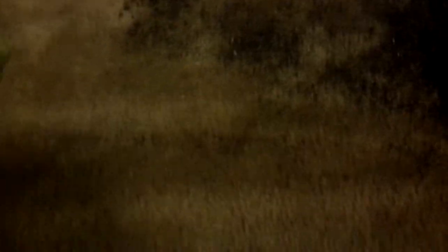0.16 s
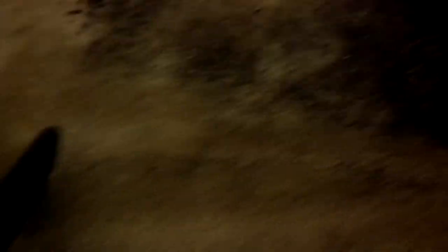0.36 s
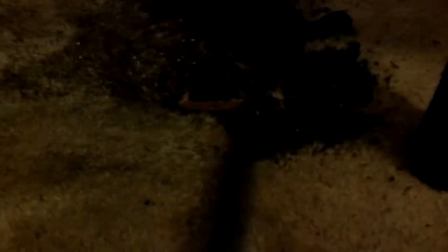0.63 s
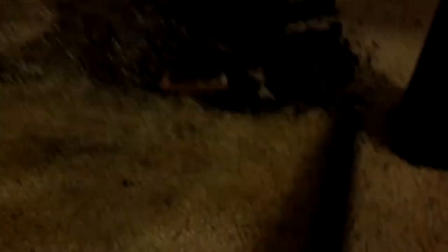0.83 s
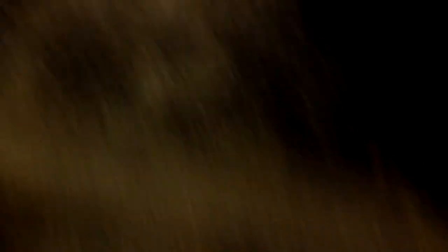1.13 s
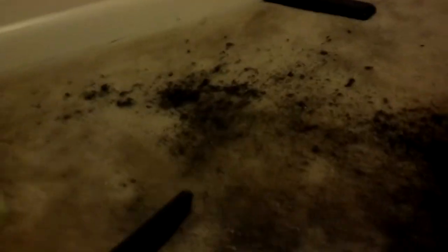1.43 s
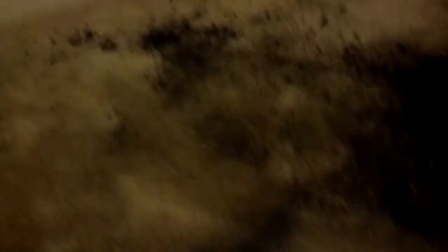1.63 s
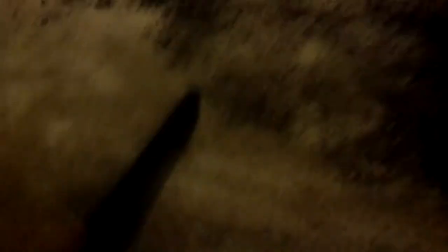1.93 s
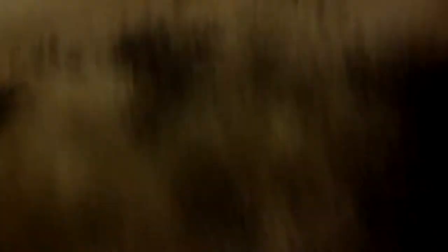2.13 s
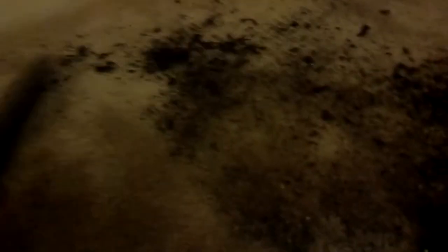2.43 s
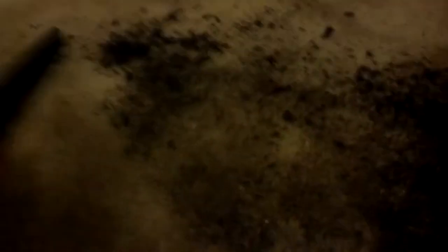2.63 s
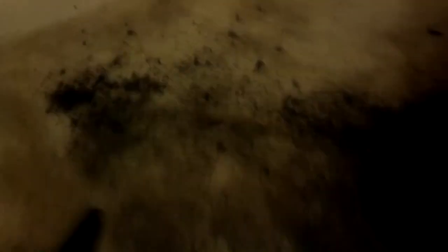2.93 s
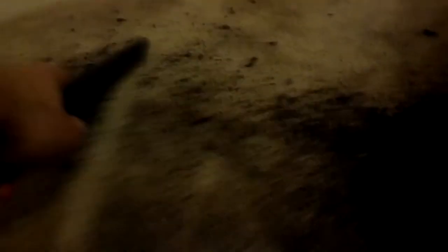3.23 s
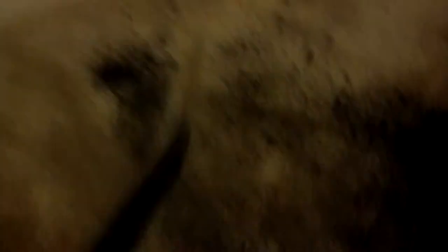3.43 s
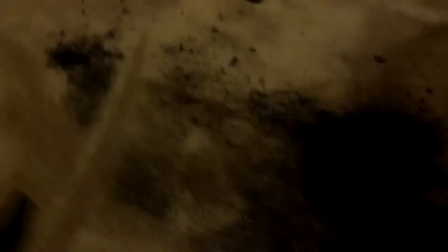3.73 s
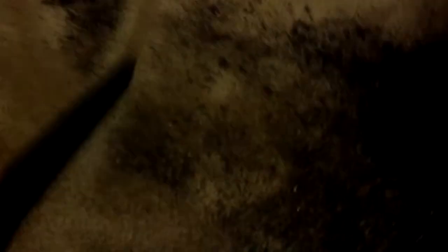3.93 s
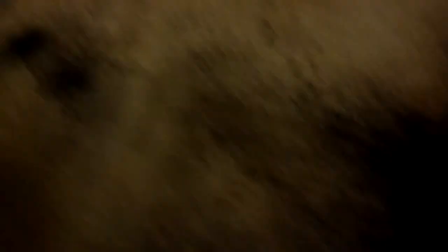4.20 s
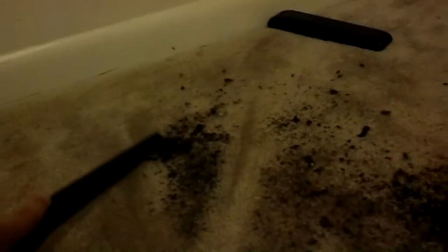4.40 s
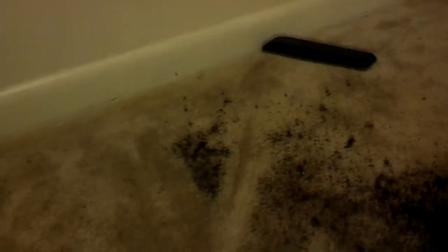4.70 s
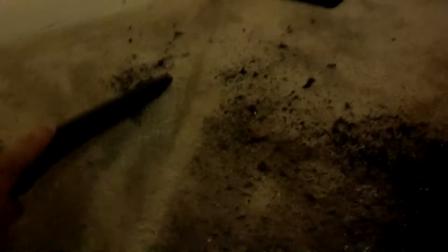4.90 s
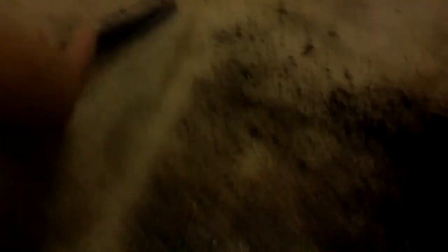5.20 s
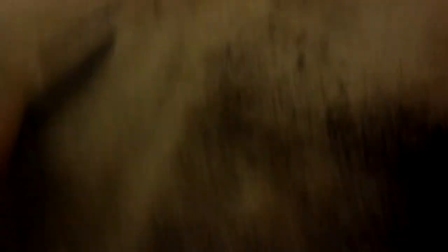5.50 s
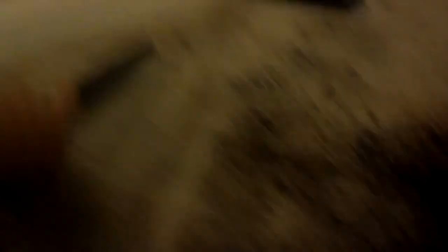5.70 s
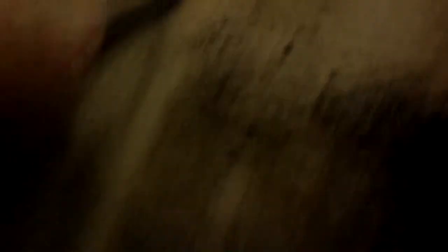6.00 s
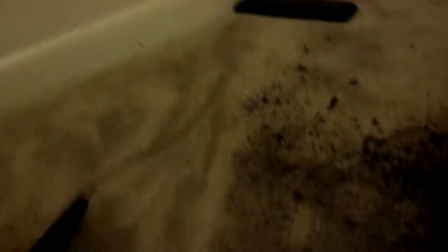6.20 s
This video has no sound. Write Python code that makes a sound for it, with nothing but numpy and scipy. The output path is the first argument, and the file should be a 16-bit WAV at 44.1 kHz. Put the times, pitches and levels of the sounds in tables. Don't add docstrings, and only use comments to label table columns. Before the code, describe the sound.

Steady vacuum roar and thin singing whine, pumping in loudness as the hose nozzle sweeps dirty carpet, bumping dully now and then.

```python
import sys
import numpy as np
from scipy import signal
from scipy.fft import rfft, irfft, next_fast_len
from scipy.io import wavfile

SR = 44100
rng = np.random.default_rng(int(sys.argv[2]) if len(sys.argv) > 2 else 0)


def volts_from_db(level):
    exponent = np.asarray(level, float) / 20
    return 10 ** exponent


def transcribe(signal):
    frames = np.atleast_2d(signal).T
    limited = np.clip(frames, -1, 1)
    pcm = np.round(limited * 32767).astype(np.int16)
    wavfile.write(sys.argv[1], SR, pcm)


N = 280035
COARSE = 40
BEAM_LAG = 16

# (time [s], level [dB])
NEARNESS = [(0, 1), (1.5, -0.5), (2.2, 0.5), (3.4, -0.5), (3.85, 3), (4.4, 1.5), (5, -0.5), (6.35, 5)]
# (time [s], length [s], change [dB])
HUM_SWELLS = [
    (.1, 0.85, -3.5),
    (.64, 0.33, -14),
    (1.0, .7, -3),
    (1.55, 0.52, -3),
    (3.1, 0.15, -3),
    (3.5, 0.52, -3),
    (3.85, 0.22, 0.5),
    (4.45, 0.36, -0.5),
    (5.4, 0.26, 0),
]


def in_time(rows):
    s, *columns = np.transpose(rows)
    return [np.interp(np.arange(N) / SR, s, c) for c in columns]


def per_sample(coarse):
    return np.interp(np.arange(N) / COARSE, np.arange(len(coarse)), coarse)


def swells(rows):
    t = np.arange(0, N, COARSE) / SR
    return per_sample(sum(db * np.clip(2 - 4 * abs(t - s) / length, 0, 1) for s, length, db in rows))


def rms_one(x):
    return x / np.sqrt(np.mean(x ** 2) + 1e-20)


def drift(rate):
    r = np.exp(-2 * np.pi * rate * COARSE / SR)
    settle = 2000
    white = rng.standard_normal(N // COARSE + 2 + settle)
    slow = signal.lfilter([1], [1, -2 * r, r * r], white)[settle:]
    return per_sample(rms_one(slow))


def resonance(x, hz, width_hz):
    r = np.exp(-np.pi * width_hz / SR)
    zeros = np.array([1, 0, -1]) * (1 - r * r) / 2
    return signal.lfilter(zeros, [1, -2 * r * np.cos(2 * np.pi * hz / SR), r * r], x)


def coloured(white, points):
    length = white.shape[-1]
    size = next_fast_len(length)
    hz = np.arange(1, size // 2 + 2) * SR / size
    point_hz, point_db = np.transpose(points)
    gain = volts_from_db(np.interp(np.log(hz), np.log(point_hz), point_db))
    return irfft(rfft(white, size) * gain, size)[..., :length]


def turns(hz):
    return 2 * np.pi * np.cumsum(hz) / SR


def tone(phase, level_db, rear_lag, rear_db=0):
    front = volts_from_db(-rear_db / 2) * np.sin(phase + rear_lag / 2)
    rear = volts_from_db(rear_db / 2) * np.sin(phase - rear_lag / 2)
    return np.sqrt(2) * volts_from_db(level_db) * np.array([front, rear])


def lag_for(pan_db, hz):
    balance = np.tanh(pan_db * np.log(10) / 40)
    return 2 * np.arctan(balance * np.tan(np.pi * hz * BEAM_LAG / SR))


def shaft_tone(shaft, speed_hz, ripple):
    # (time [s], level [dB], left-right [dB])
    shaft_course = [(0.0, -34.5, 3), (0.3, -35.5, 6), (0.45, -39.5, 7), (0.48, -43, 9), (0.61, -60, 11),
                    (0.79, -49, 16), (0.86, -54.5, 10), (1.21, -34.5, 4.2), (1.59, -39.5, 5.5),
                    (1.83, -33.5, 4.5), (3.32, -33.6, 3.5), (3.53, -41.5, 6.5), (4.14, -31, 6.5),
                    (4.41, -42, 11), (4.47, -41, 12), (5.04, -38, 8), (5.18, -34.0, 7.3), (6.34, -30, 6.5)]
    # (ripple multiple, level [dB], fading [dB])
    shaft_sides = [(0, 1.05, 0.86), (1, -18, 2)]
    # (time [s], length [s], change [dB])
    shaft_swells = [
        (1.1, 0.093, -3.5),
        (2.93, 0.28, -2),
        (3.62, .14, -4),
        (3.9, 0.16, 4),
        (4.76, 0.079, -10),
        (4.85, 0.16, 1),
    ]
    # (time [s], length [s], change [dB])
    beat_swells = [
        (.2, 0.66, 1),
        (2.0, 0.37, -6),
        (3.1, .5, -3),
        (4.0, .3, -3),
        (4.9, .6, 5.5),
        (5.9, 1.8, 4),
    ]
    course_db, pan_db = in_time(shaft_course)
    out = np.zeros((2, N))
    for k, db, fading_db in shaft_sides:
        level_db = course_db + swells(shaft_swells) + db + k * swells(beat_swells) + fading_db * drift(2.3)
        out += tone(shaft + k * ripple, level_db, lag_for(pan_db, speed_hz))
    return out


def mains_hum(ripple, near_db):
    # (time [s], left-right [dB])
    hum_pan = [(0, 13), (.5, 11), (1.3, 6), (1.6, 9.5), (2.4, 4.5), (3.8, 6), (4.2, 1.5), (4.8, 4.5),
               (5.5, 4.5), (6, 1), (6.35, 4)]
    # (time [s], length [s], change [dB])
    low_hum_swells = [
        (0, 0.18, 12),
        (.3, 0.41, 10),
        (1.96, 0.22, 9.9),
        (2.56, 0.13, 8.7),
        (2.79, 0.12, 7.6),
        (6.3, 0.22, 3),
    ]
    pan_db = in_time(hum_pan)[0]
    hum = tone(2 * ripple, near_db + swells(HUM_SWELLS) - 38, lag_for(pan_db, 250), rear_db=0.95)
    return hum + tone(ripple, swells(low_hum_swells) - 54.4, 0.033, rear_db=-2.0)


def shaft_orders(shaft, near_db):
    # (shaft multiple, level [dB], rear phase lag [rad], rear louder [dB], fading [dB])
    housing_orders = [(2, -12.5, 0.27, 1, 3), (3, -14.5, 1.5, 6, 0.5), (4, -5, 2.9, 14, 1)]
    blade_orders = [(9.01, -6, 0.96, 11.4, 3.9), (18.04, -9, 0.42, .1, 5.1), (23, -17, 0.65, 3, 4),
                    (27, -13, 2.7, 5, 3), (29.5, -19, .5, 6, 3.7)]
    # (time [s], length [s], change [dB])
    housing_swells = [(.06, 1, 10), (.65, 0.24, -8), (1.01, 0.17, 9.5), (1.84, 0.21, 8), (2.02, 0.12, 5.5),
                      (2.73, .17, 9), (3.42, 0.18, 9.5), (3.73, 0.44, 8.5), (4.41, .58, 9), (4.9, 0.19, 2),
                      (5.5, 0.27, 4), (5.95, 0.28, -1), (6.15, 0.12, 9.5)]
    blade_swells = [(.14, 0.13, 9.5), (.37, 0.12, 9), (.5, 0.14, 8), (.78, 0.11, 3), (1.22, .11, 9.5),
                    (1.57, 0.08, 2), (1.85, .4, -6), (2.35, 0.24, 5.5), (2.85, 0.66, 2), (3.15, 0.08, 10),
                    (3.29, .08, 7), (3.79, 0.071, 4), (4.58, 0.29, 7), (4.79, 0.095, 6), (5.1, 0.33, 1.5),
                    (5.48, 0.097, 6), (5.78, 0.33, 2.5), (6.01, 0.052, 6.5)]
    # (time [s], length [s], change [dB])
    panel_swells = [
        (.2, .6, -3),
        (3.62, 0.27, 8),
        (5.05, .2, 14),
        (5.93, .3, 11),
    ]
    out = np.zeros((2, N))
    for orders, group_db in ((housing_orders, swells(housing_swells) - 56.5),
                             (blade_orders, swells(blade_swells) - 59)):
        for k, db, lag, rear_db, fading_db in orders:
            panel_db = (k == 3) * swells(panel_swells)
            level_db = group_db + near_db + db + panel_db + fading_db * drift(13.0)
            multiple = round(2 * k) / 2
            out += tone(multiple * shaft, level_db, lag + 0.61 * drift(4.5), rear_db)
    return out


def commutator_whine(shaft, ripple, near_db):
    # (ripple multiple, level [dB])
    whine_sides = [(-2, -14), (-1, -1.5), (1, -4), (2, -24)]
    # (time [s], length [s], change [dB])
    whine_swells = [(.15, 0.16, 3.5), (.65, 0.57, -17), (1.05, 0.067, -8), (1.66, 0.087, 5),
                    (2.48, .15, -4), (2.85, 0.16, -1.5), (3.18, 0.26, -6), (3.5, .2, 1), (3.67, 0.27, -9),
                    (4.08, 0.2, -3), (4.3, 0.28, 5.5), (4.7, .4, 4.5), (5.15, .12, -7), (5.63, .1, -4),
                    (5.85, 0.085, -5), (6.1, 0.12, 0)]
    sparking = 1 + 0.076 * drift(400)
    shade_db = near_db + swells(whine_swells)
    carrier = (0.0033, -53)
    out = np.zeros((2, N))
    for k, db in [carrier] + [(k, db - 56.5) for k, db in whine_sides]:
        phase = 22 * shaft + k * ripple + 1.05 * abs(k)
        out += sparking * tone(phase, db + shade_db + 2.4 * drift(9.5), 3.3 + 0.92 * drift(2.0), rear_db=21.5)
    return out


def motor(ripple):
    # (time [s], shaft speed [Hz])
    speed = [(0, 517.5), (.16, 522), (.7, 519), (1.09, 513.6), (1.24, 517.7), (2.07, 518), (2.9, 516),
             (3.2, 520.5), (3.45, 514.2), (3.73, 510), (3.97, 518), (4.14, 512.8), (4.33, 514.2),
             (4.66, 512.2), (4.9, 516.5), (5.76, 515), (5.9, 510), (6.35, 517)]
    speed_hz, near_db = in_time(speed)[0], in_time(NEARNESS)[0]
    shaft = turns(speed_hz * (1 + 0.00072 * drift(23)))
    out = shaft_tone(shaft, speed_hz, ripple) + mains_hum(ripple, near_db)
    return out + shaft_orders(shaft, near_db) + commutator_whine(shaft, ripple, near_db)


def hose_resonances(white, roar_db):
    # (pitch [Hz], width [Hz], level [dB], rear louder [dB])
    cavities = [(947, 18.5, -63.5, 2), (1157.5, 98, -55, -4.5), (1255.4, 26, -58, -6), (1781, 78, -67, 17),
                (2560, 60, -105, -6), (6070, 310, -68.5, -1)]
    # (time [s], length [s], change [dB])
    hose_swells = [
        (.15, .3, -6),
        (.85, 0.65, -5),
        (1.6, 0.55, 1),
        (2.7, 0.46, 2.5),
        (3.3, 0.56, 3.5),
        (5.75, 0.2, -2),
    ]
    body_db = 1.1 * roar_db + 0.18 * swells(HUM_SWELLS)
    out = np.zeros((2, N))
    for hz, width_hz, db, tilt_db in cavities:
        ring = rms_one(resonance(resonance(white, hz, width_hz), hz, width_hz))
        level_db = db + body_db + swells(hose_swells) + 1.55 * drift(2.6)
        out += volts_from_db(level_db + [[-tilt_db / 2], [tilt_db / 2]]) * ring
    return out


def air(ripple):
    centres_hz = [1300, 3400, 8000, 15000]
    # (pitch [Hz], density [dB per Hz])
    air_colour = [(30, -59), (105, -30), (150, -30.5), (190, -27.5), (400, -26.5), (850, -35.5),
                  (1300, -40), (2800, -45.5), (4200, -48.5), (8000, -49.5), (10500, -50), (11700, -48),
                  (13000, -51), (15000, -45)]
    # (pitch [Hz], share common to both ports [0-1], part of it late at the rear [0-1], rear louder [dB])
    ports = [(60, 0.98, 0, 3), (302, 1, 0.84, -0.1), (980, 0.82, 0, -2.5), (1990, 0.4, 0.11, 17.5),
             (2760, 0.65, 1, 16), (3300, 0.33, 0.2, -12.5), (4840, 0, 0.16, -6), (6560, 0.25, 0.25, 8),
             (9900, 0.25, 0.5, -12), (11400, 0, 0.14, 5), (15000, 0, .03, 12.5)]
    # (time [s], length [s], change [dB])
    puffs = [
        (.53, .05, 4),
        (.715, 0.02, 6),
        (.868, .02, 1.5),
        (2.1, .07, 4),
        (2.2, 0.12, 2.5),
    ]
    # (time [s], length [s], change [dB])
    roars = [
        (.25, 0.53, 0.5),
        (.7, 0.68, -2),
        (2.75, 0.71, 1),
        (3.85, .25, 1),
        (4.75, 0.2, -0.5),
        (5.55, 0.19, 1.5),
        (6.15, 0.28, 1.5),
    ]
    # (time [s], length [s], change [dB])
    bites = [
        (.65, 0.46, -2),
        (1.03, .14, 4),
        (3.08, 0.046, 4.5),
        (3.65, 0.28, 7),
        (4.07, 0.22, 4.5),
        (4.45, 0.46, 4),
        (5.0, .5, 0),
        (5.8, 0.094, 2.5),
        (5.95, .4, 1),
    ]
    # (time [s], length [s], change [dB])
    lifts = [
        (.15, .5, -4),
        (.62, .31, 3),
        (1.12, 0.13, 0),
        (1.34, 0.23, 5),
        (1.54, 0.16, 3),
        (1.7, .13, 4),
        (2.5, 0.29, -0.5),
        (3.01, .2, 3),
        (4.5, .4, 1.5),
        (5.8, 0.092, 0),
    ]
    rear_lag = 8
    flow_db = 1.46 + in_time(NEARNESS)[0] + swells(puffs)
    roar_db = flow_db + swells(roars)
    bite_db = swells(bites)
    levels = np.array([roar_db + 1.0, flow_db + bite_db, flow_db + 0.86 * bite_db, flow_db + swells(lifts)])
    white = rng.standard_normal((2, 3, N + rear_lag))
    rush = coloured(white, air_colour)
    out = np.zeros((2, N))
    edges = np.geomspace(30, 17000, 23)
    port_hz, common, late, rear_db = np.transpose(ports)
    for k, (low, high) in enumerate(zip(edges, edges[1:])):
        band = signal.butter(2, [low, high], "band", fs=SR, output="sos")
        near, front, rear = signal.sosfilt(band, rush[k % 2])
        place = np.log(low * high) / 2
        share = np.clip(np.interp(place, np.log(port_hz), common), 0, 1)
        lagged = np.interp(place, np.log(port_hz), late)
        tilt = volts_from_db(np.interp(place, np.log(port_hz), rear_db) / 2)
        weights = np.array([np.interp(place, np.log(centres_hz), row) for row in np.eye(len(levels))])
        gain = volts_from_db(weights @ levels + 1.65 * drift(18.0))
        near_front = near[rear_lag:]
        near_rear = (1 - lagged) * near_front + lagged * near[:N]
        out[0] += gain / tilt * (np.sqrt(share) * near_front + np.sqrt(1 - share) * front[:N])
        out[1] += gain * tilt * (np.sqrt(share) * near_rear + np.sqrt(1 - share) * rear[:N])
    out += hose_resonances(white[1, 2, :N], roar_db)
    return out * (1 + 0.03 * np.sin(ripple))


def knocks():
    # (time [s], peak [dB], pitch [Hz])
    bumps = [
        (0.561, -21, 755),
        (0.57, -22, 180),
        (0.706, -35, 452),
        (0.72, -28, 770),
        (0.864, -18, 760),
        (1.054, -32, 510),
        (1.27, -22, 90),
        (2.575, -16, 160),
        (5.15, -19.5, 175),
    ]
    out = np.zeros(N)
    for s, db, hz in bumps:
        click = np.zeros(N) + 1e-18
        click[round(s * SR)] = volts_from_db(db + 27.5)
        out += resonance(click, hz, 100) + 0.066 * resonance(click, 3.1 * hz, 400)
    return signal.lfilter([.3], [1, -.7], out)


def scene():
    # (time [s], hum pitch [Hz])
    hum_hz = [(0, 238.3), (3, 236.6), (6.35, 235.1)]
    ripple = turns(in_time(hum_hz)[0]) / 2
    return motor(ripple) + air(ripple) + knocks()


def ducking():
    # (time of lowest gain [s], depth [dB], recovery [s])
    ducks = [(0.11, 7.5, 0.15), (0.446, 7.5, 0.16), (0.639, 5, 0.26), (0.768, 7, 0.28), (0.915, 3, 0.13),
             (1.115, 9, 0.19), (1.307, 9.5, 0.28), (1.453, 0.5, 0.54), (1.669, 6, 0.31), (1.743, 8, 0.54),
             (2.161, 0, 0.53), (2.38, 4, 0.21), (2.648, 3.5, 0.12), (2.888, 4.3, 0.21), (3.002, 5, 0.13),
             (3.133, 7, 0.16), (3.359, 9.5, 0.25), (3.776, 2, 0.5), (3.996, 4.5, 0.23), (4.266, 5, 0.21),
             (4.446, 6, 0.32), (4.881, 4.5, 0.23), (5.281, 7.5, 0.19), (5.522, 2.6, 0.32),
             (5.699, 2.5, 0.076), (5.871, 2, 0.75), (6.048, 5, 0.32), (6.248, 2, 0.87)]
    fall_s = 0.047
    t = np.arange(0, N, COARSE) / SR
    depth_db = 0
    for s, db, back_s in ducks:
        fall, recovery = 1 + (t - s) / fall_s, 1 - (t - s) / back_s
        depth_db = depth_db + db * np.clip(np.minimum(fall, recovery), 0, 1)
    return per_sample(volts_from_db(-depth_db))


def roll_off(x):
    return signal.sosfilt(signal.butter(12, 17100, fs=SR, output="sos"), x)


def record(dry):
    blur = 0.014
    taps = np.concatenate([np.zeros(BEAM_LAG - 1), [blur, 1 - 2 * blur, blur]])
    beams = ducking() * (dry - signal.lfilter(taps, [1], dry[::-1]))
    top_cut = signal.ellip(12, .5, 70, 15740, fs=SR, output="sos")
    return roll_off(signal.sosfilt(top_cut, beams))


dry = scene()
out = record(dry)
transcribe(out)
```